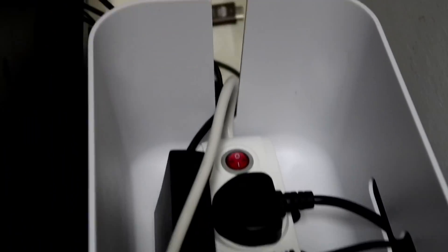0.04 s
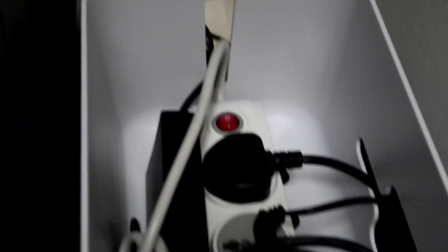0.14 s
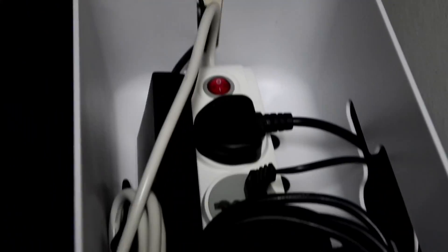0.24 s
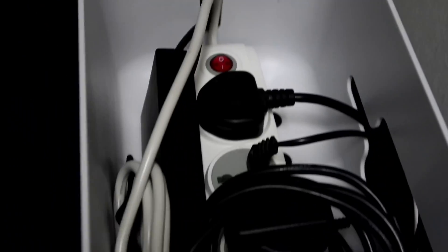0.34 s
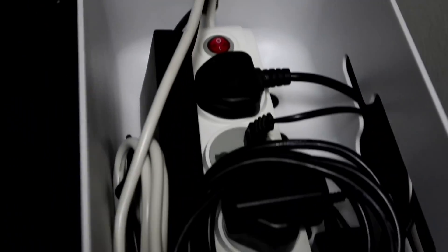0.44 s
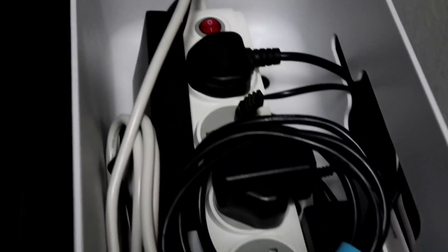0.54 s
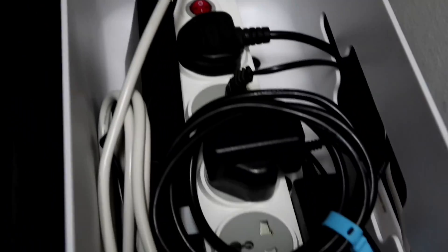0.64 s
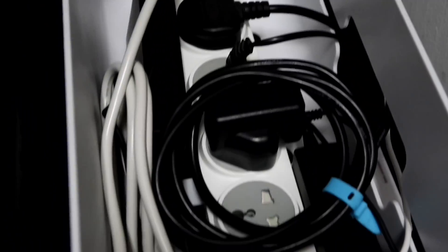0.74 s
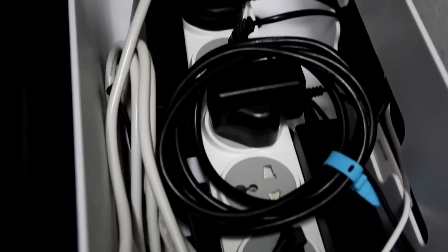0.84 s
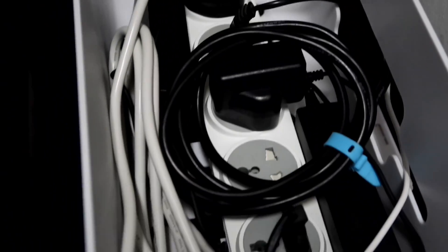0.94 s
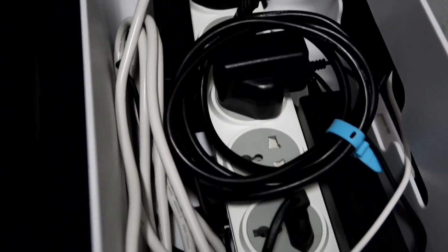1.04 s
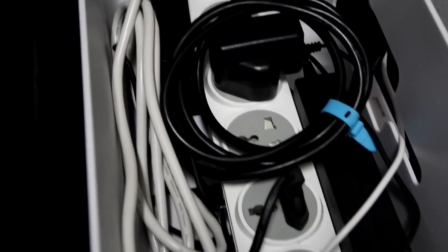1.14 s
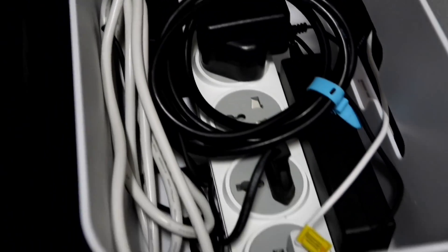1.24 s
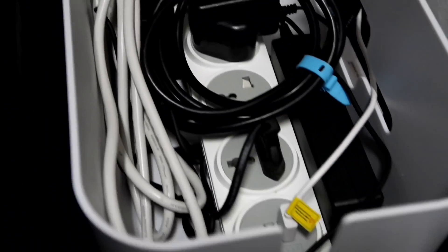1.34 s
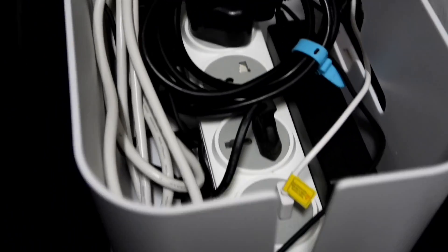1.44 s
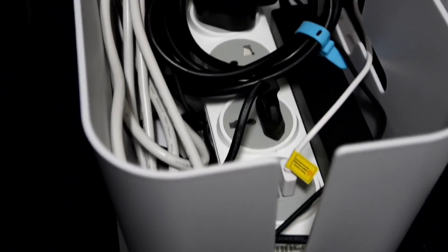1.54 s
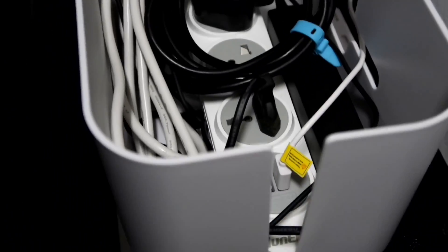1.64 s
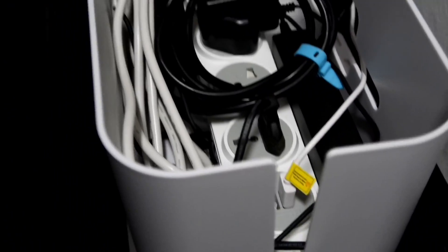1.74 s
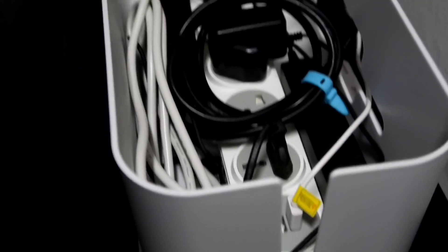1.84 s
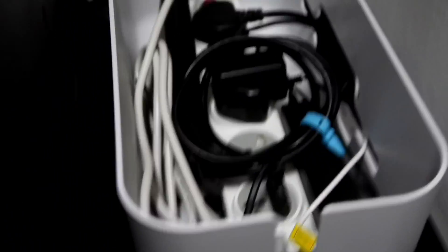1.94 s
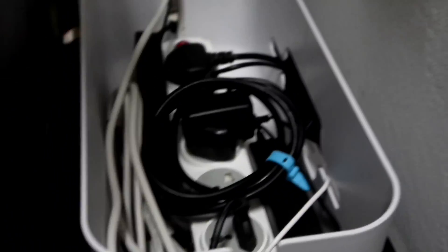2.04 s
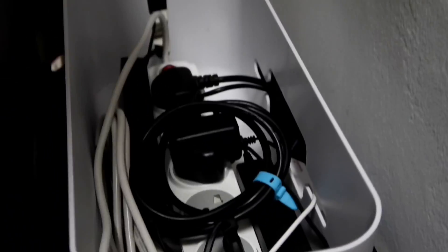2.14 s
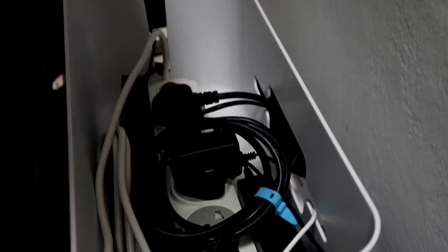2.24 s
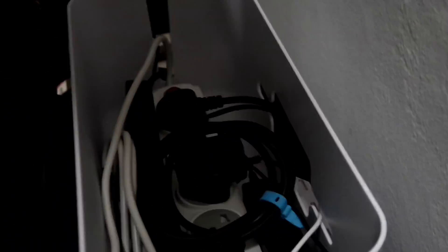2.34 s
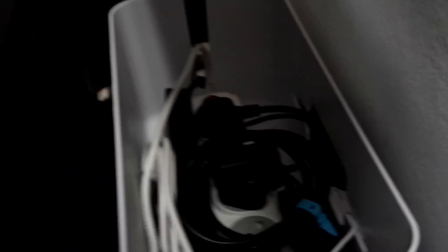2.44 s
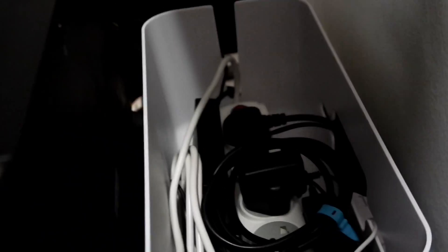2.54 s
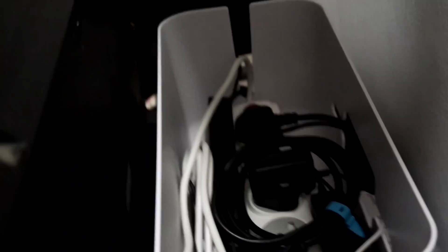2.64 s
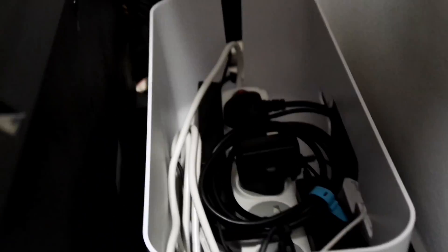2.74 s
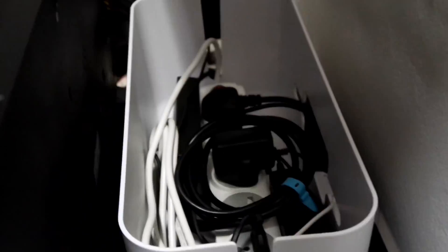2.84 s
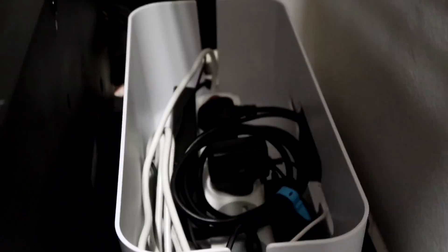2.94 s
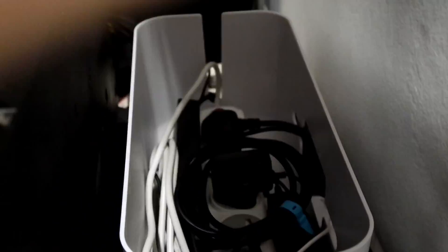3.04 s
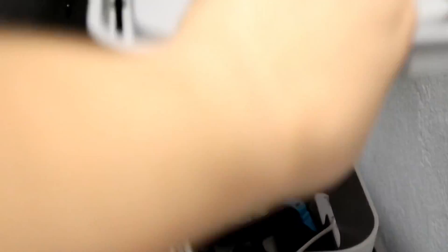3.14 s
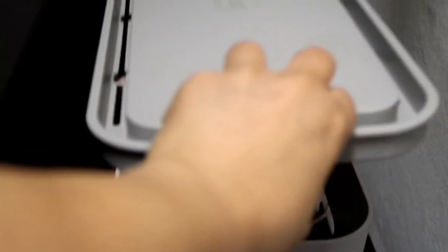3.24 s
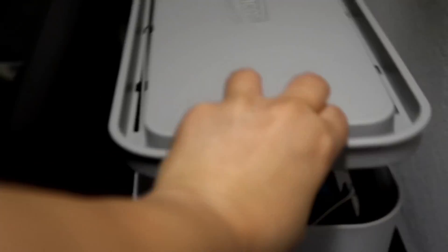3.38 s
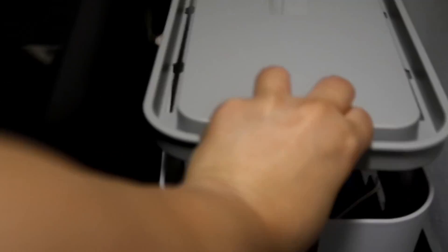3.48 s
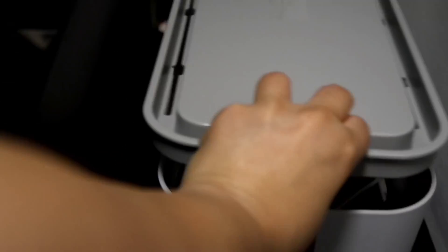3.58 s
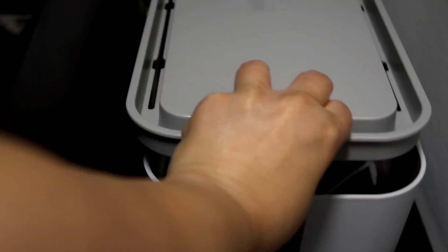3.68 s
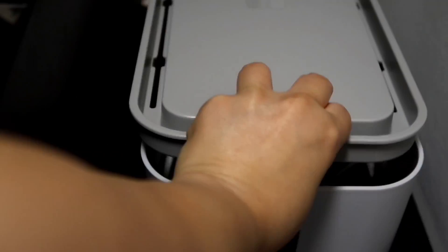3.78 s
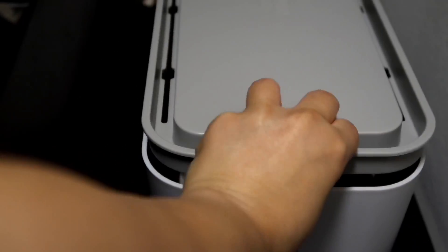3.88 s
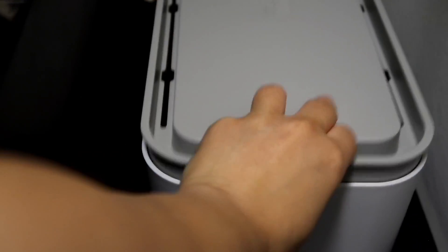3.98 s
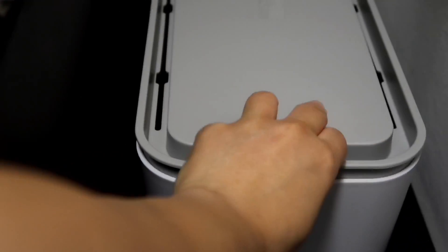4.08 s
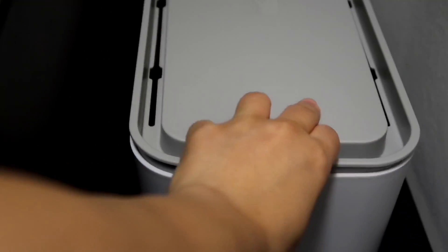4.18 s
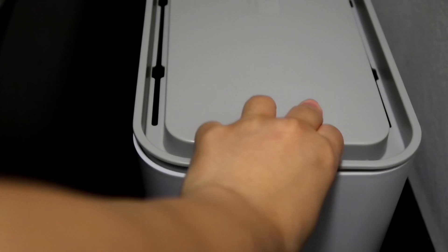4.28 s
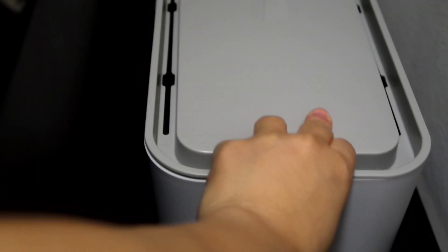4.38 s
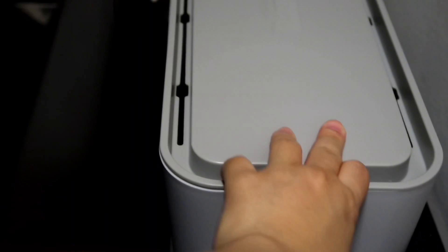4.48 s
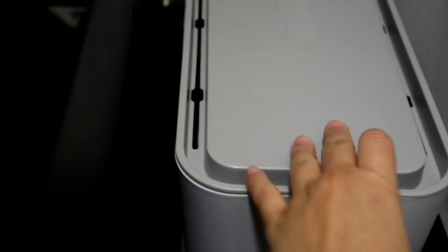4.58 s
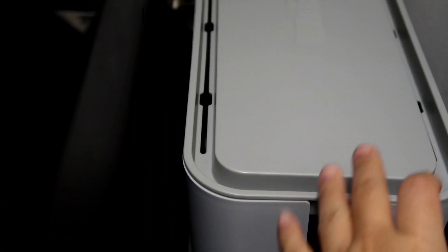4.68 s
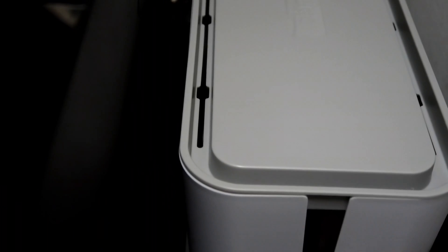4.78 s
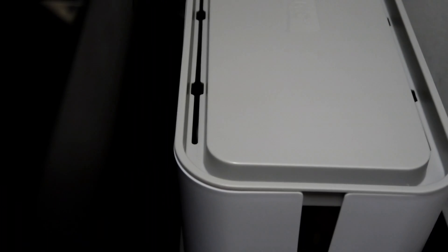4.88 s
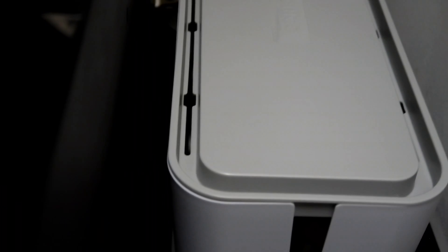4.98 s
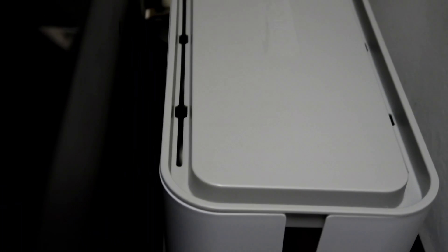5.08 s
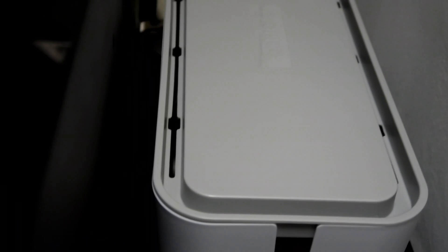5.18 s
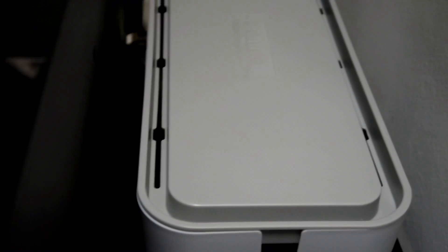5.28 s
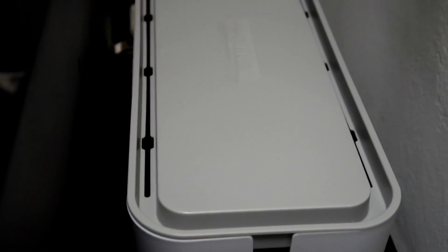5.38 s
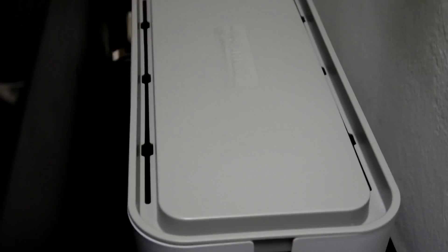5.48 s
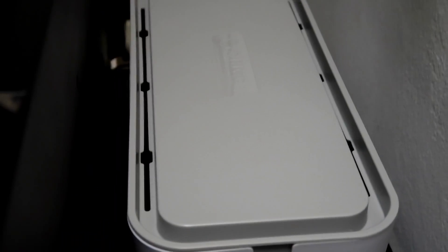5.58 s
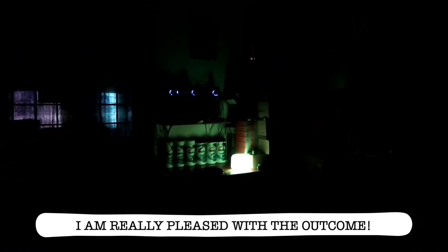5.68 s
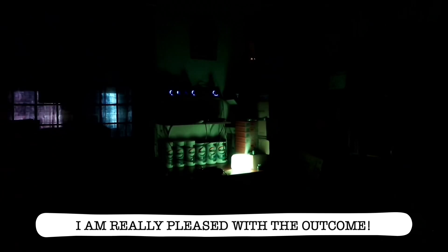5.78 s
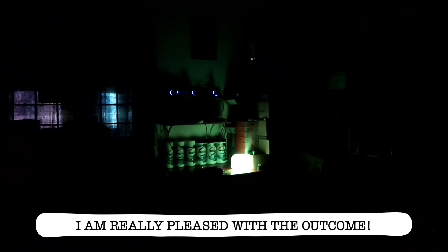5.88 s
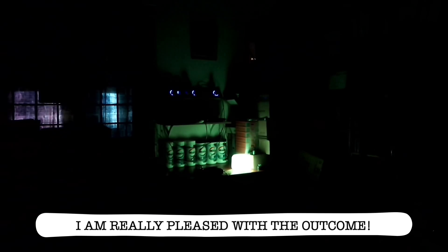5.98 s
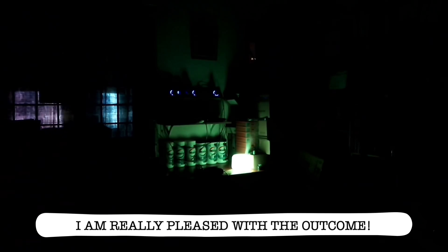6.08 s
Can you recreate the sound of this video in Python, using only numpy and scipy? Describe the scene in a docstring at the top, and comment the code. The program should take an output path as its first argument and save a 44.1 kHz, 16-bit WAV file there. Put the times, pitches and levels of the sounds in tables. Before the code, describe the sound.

Close plastic clacks, a short clatter and three squeaks as a lid is pressed onto a box, with hum and faint clock ticking behind.

```python
"""A plastic cable box is closed by hand, close to a stereo microphone in a small room.
The lid is picked up with a clack and a snap, clatters onto the rim, squeaks as it slides down and
clicks home. Behind it are a low mains hum, a faint clock and, early on, one far-off chirp or creak.
Near the end the sound drops out briefly, then a different room's steady background noise follows."""
import sys
import numpy as np
from scipy import signal
from scipy.fft import rfft, irfft, next_fast_len
from scipy.io import wavfile

SR = 44100
rng = np.random.default_rng(int(sys.argv[2]) if len(sys.argv) > 2 else 0)


def pcm_store(signal):
    """Save signal as 16-bit PCM."""
    levels = np.round(np.clip(np.atleast_2d(signal), -1, 1) * 32767)
    wavfile.write(sys.argv[1], SR, levels.astype(np.int16).T)


N = 269847
TIME = np.arange(N) / SR
AGE = TIME[:SR // 3]  # seconds since a blow
# the far-off creak, then the lid's three squeaks:
# (start [s], length [s], level [dB], pitch [Hz], jitter [share of pitch], rasp [dB])
RASPY_TONES = [(.848, 0.057, -53, 1430, .065, -4), (3.939, .085, -28.5, 1135, .02, -13),
               (4.12, .105, -27, 1105, .026, -17), (4.226, .23, -32.5, 1060, .026, -20)]


def lid_knocks():
    """The lid clatters onto the rim of the box and clicks home."""
    # blows on the rim: (time [s], level [dB], clack [dB], snap [dB], ring [dB])
    knocks = [(3.6455, -18.5, 6.5, -9.5, 6.5), (3.691, -22.5, 1.5, 2.5, -10), (3.738, -40, 11, 7, -12),
              (3.7675, -30, 1, -2, -9), (3.7825, -15, -7.5, 1, -1), (3.81, -23, 1, -3.5, -11),
              (3.823, -30, 7, 1.5, -14), (3.911, -23, -3, -0.5, -4), (4.012, -25.5, 1, 1.5, -6),
              (4.0385, -26.5, 9, 11, -9), (4.0425, -19, .5, -1.5, 3), (4.228, -34.5, -10, -1.5, -17),
              (4.348, -31.5, -10, -14, -0.5), (4.361, -31.5, -8, -8, -8), (4.427, -29.5, -2.5, -10, -11)]
    # spectrum of the shell on the rim: (frequency [Hz], gain [dB])
    rim_tone = [(40, -40), (125, -23.5), (200, -12), (270, -0.5), (400, -2), (600, -2.5), (780, -0.5),
                (1400, -4.5), (2100, -13), (3200, -18.5), (5300, -19.5), (8000, -28), (16000, -38.5)]
    # its modes, free of the hand: (frequency [Hz], level [dB], t60 [s])
    rim_modes = [(269, -13.5, .11), (544, -15, .16), (700, -5.5, 0.05), (765, -4, 0.039), (819, 2, 0.1),
                 (1430, -11, 0.057), (1944, -15.5, 0.088), (2416, -9.5, 0.075)]
    return blows(knocks, rim_tone, rim_modes, crack=.26, thud_db=-1, thud_trade=.54)


def lid_lift():
    """The lid clacks as it is picked up and rings in the air."""
    # blows of the lift: (time [s], level [dB], clack [dB], snap [dB], ring [dB])
    lifts = [(2.2477, -17.5, 0, 1, 1), (2.302, -36.5, -5, -4, -16), (2.336, -40, -2, 9.5, -14),
             (2.342, -32, -19, -21, -16)]
    # spectrum of the lifted shell: (frequency [Hz], gain [dB])
    lift_tone = [(40, -32), (130, -10.5), (240, 3), (400, -1.5), (600, -11.5), (850, -5.5), (1350, -11),
                 (1750, 0), (2400, -4.5), (4000, -2.5), (5300, -10.5), (7000, -16.5), (16000, -27)]
    # its modes: (frequency [Hz], level [dB], t60 [s])
    lift_modes = [(237, -11.5, 0.26), (498, -25, 0.72), (813, -14, 0.13), (1090, -16.5, 0.11),
                  (1606, 3.5, 0.042), (1698, 1.5, 0.037), (3760, -32, .12), (5300, -7.5, 0.031)]
    return blows(lifts, lift_tone, lift_modes, crack=.3, thud_db=1.5, thud_trade=.45)


def blows(rows, tone, modes, crack, thud_db, thud_trade):
    """Each contact has its own clack, snap and ring; the less a blow rings, the more it thuds."""
    hand_down_s, settle_s, pitch_drop = 3.75, .024, .11  # the hand comes to rest on the lid
    out = np.zeros(N)
    for s, db, clack_db, snap_db, ring_db in rows:
        weight = 1 - np.exp(-max(s - hand_down_s, 0) / settle_s)
        contact = [(300, thud_db - thud_trade * ring_db), (600, 0), (1000, 0),
                   (1800, clack_db), (3600, clack_db), (7000, snap_db)]
        impact = colour(strike(tone, crack), contact)
        ringing = amp(ring_db) * ring(modes, pitch=1 - pitch_drop * weight)
        add(out, s, amp(db) * (impact + ringing))
    return out


def strike(tone, crack):
    """A blow on plastic: a sharp crack, then the dense ring of the shell."""
    # decay of the plastic: (frequency [Hz], t60 [s])
    plastic_t60 = [(200, 0.14), (800, 0.083), (3000, 0.054), (10000, .035)]
    shell = dying_noise(plastic_t60)
    shell[0] += crack
    return burst(colour(shell, tone))


def ring(modes, pitch=1):
    """Damped modes start together; a pitch below 1, the weight of a hand, lowers and shortens them."""
    motion = 0
    for k, (hz, db, t60) in enumerate(modes):
        decay = 1e-3 ** (AGE / (t60 * pitch ** 4))
        motion += (-1) ** k * amp(db) * decay * np.sin(2 * np.pi * hz * pitch * AGE)
    return burst(highpass(motion, hz=190))  # a small panel radiates no deep bass


def lid_edge(snap_s=2.4755, snap_db=-23, ring_db=-26, scrape_ring=1.4):
    """The thin edge snaps free and scrapes on, exciting the same modes; fingertips tick on it."""
    # modes of the edge: (frequency [Hz], level [dB], t60 [s])
    edge_modes = [(638, -12.5, 0.43), (1556, -12.5, 0.26), (2060, -10, 0.16), (3284, -9, .08),
                  (3671, 0, 0.076), (4190, -3, 0.089), (5360, 1, 0.07), (5550, 6.5, 0.042),
                  (7450, -17, .09)]
    # its bright spectrum: (frequency [Hz], gain [dB])
    edge_tone = [(100, -15), (600, -5.5), (1800, -0.5), (3600, 3.5), (7500, 3.5), (9500, -9.5),
                 (16000, -9.5)]
    # light finger touches: (time [s], level [dB])
    touches = [(1.996, -54), (3.116, -49), (4.586, -56), (4.772, -56.5)]
    # scrapes of the edge: (start [s], length [s], level [dB])
    scrapes = [(2.491, 0.0055, -47), (2.519, 0.049, -45)]
    out, ringing = np.zeros(N), ring(edge_modes)
    add(out, snap_s, amp(snap_db) * strike(edge_tone, crack=.38) + amp(ring_db) * ringing)
    for s, db in touches:
        add(out, s, amp(db) * strike(edge_tone, crack=.28))
    slips = friction(slips_per_s=990, spread_db=5)
    grit = unit(colour(slips, edge_tone))
    resonance = unit(signal.oaconvolve(slips, ringing)[:N])
    pressure = strokes(scrapes, attack_s=.004, sag_db_per_s=35, release_s=.016)
    return out + pressure * unit(grit + scrape_ring * resonance)


def lid_squeaks():
    """The lid sticks and slips on its way down, squeaking three times."""
    return raspy_tones(RASPY_TONES[1:])


def raspy_tones(rows, full_db=-30, dulling=.21, flutter_db=2.5):
    """Unsteady, raspy tones that scoop up in pitch, then sink and dull as they fade."""
    # harmonics at full level, lowest first: (level [dB])
    partials = [1, -6, -14, -22.5]
    scoop, rise_s, sink_hz_per_s = .24, .025, 950  # scoop: share by which a tone starts flat
    out = np.zeros(N)
    for s, length_s, db, pitch_hz, unsteady, rasp_db in rows:
        gain = amp(db) * stroke(length_s, attack_s=.029, sag_db_per_s=55, release_s=.033)
        age = TIME[:len(gain)]
        hz = pitch_hz * (1 - scoop * np.exp(-(age / rise_s) ** 2)) - sink_hz_per_s * age
        jitter = unsteady * wander(280)[:len(age)]
        turns = np.cumsum(hz * (1 + jitter)) / SR
        fade_db = np.minimum(20 * np.log10(gain + 1e-9) - full_db, 0)
        tone = sum(amp(partial_db + dulling * k * fade_db) * np.sin(2 * np.pi * (k + 1) * turns)
                   for k, partial_db in enumerate(partials))
        puffs = rng.standard_normal(len(turns)) * np.cos(np.pi * turns) ** 2  # one per cycle
        rasp = unit(colour(puffs, [(1400, -9.5), (4100, -1), (8000, -32)])) * amp(rasp_db + fade_db / 2)
        flutter = unit(amp(flutter_db * wander(110)))[:len(age)]
        add(out, s, (unit(tone) + rasp) * gain * flutter)
    return out


def lid_rubbing():
    """Dull dragging of the shell and the light hiss of skin on it."""
    # plastic dragging on plastic: (start [s], length [s], level [dB])
    rubs = [(2.345, 0.035, -50), (2.49, .1, -47), (2.78, .04, -45), (2.848, .014, -40.5),
            (3.445, 0.016, -44.5), (3.795, .045, -35), (3.92, .04, -43), (4.122, .05, -44),
            (4.24, .13, -40.5), (4.425, .04, -41.5), (4.5, 0.14, -52.5)]
    # spectrum of the drag: (frequency [Hz], gain [dB])
    rub_tone = [(100, -33), (220, -15), (320, 1), (720, 0.5), (1000, -4), (1500, -14.5), (2200, -16.5),
                (4000, -35), (12000, -43)]
    # skin brushing the lid: (start [s], length [s], level [dB])
    brushes = [(4.565, .045, -48), (4.78, .18, -52)]
    skin_tone = [(200, -2), (1300, 2), (5000, -5.5), (15000, -19.5)]
    drag = unit(colour(friction(slips_per_s=700, spread_db=.5), rub_tone))
    skin = unit(colour(friction(slips_per_s=3000, spread_db=3), skin_tone))
    return (drag * strokes(rubs, attack_s=.013, sag_db_per_s=23, release_s=.048)
            + skin * strokes(brushes, attack_s=.026, sag_db_per_s=65, release_s=.04))


def friction(slips_per_s, spread_db):
    """Tiny slips of uneven size at random moments."""
    size = amp(spread_db * np.minimum(rng.exponential(1, N), 4))
    return size * rng.choice([-1, 1], N) * (rng.random(N) < slips_per_s / SR)


def stroke(length_s, attack_s, sag_db_per_s, release_s):
    """An envelope that builds, eases slowly and lets go."""
    age = TIME[TIME < length_s + release_s]
    attack = np.sin(np.pi / 2 * np.minimum(age / attack_s, 1)) ** 2
    release = np.clip(1 - (age - length_s) / release_s, 0, 1) ** 2
    return attack * amp(-sag_db_per_s * age) * release


def strokes(rows, attack_s, sag_db_per_s, release_s):
    """Gain over time of a series of strokes that share one envelope."""
    gain = np.zeros(N)
    for s, length_s, db in rows:
        add(gain, s, amp(db) * stroke(length_s, attack_s, sag_db_per_s, release_s))
    return gain


def far_creak():
    """A faint, rough, far-off chirp or creak before the lid is picked up."""
    return raspy_tones(RASPY_TONES[:1])


def clock(tick_db=-49, tock_db=-49.5, period_s=.5165, tock_lag_s=.263, rise_s=.0042, t60=.17):
    """A clock across the room: two alternating beats ring its case, blurred by the walls."""
    # case resonances on the tick: (frequency [Hz], width [Hz], level [dB])
    tick_modes = [(2535, 330, 1.5), (5730, 290, -5)]
    # and on the tock: (frequency [Hz], width [Hz], level [dB])
    tock_modes = [(2880, 950, 2), (4770, 1100, -6.5)]
    out, hz = np.zeros(N), np.arange(1, SR // 2, 20)
    envelope = (1 - np.exp(-AGE / rise_s)) * 1e-3 ** (AGE / t60)
    treble_loss = np.hypot(1, (hz / 7500) ** 3)
    for lag, modes, db in ((0, tick_modes, tick_db), (tock_lag_s, tock_modes, tock_db)):
        gain = sum(amp(peak_db) / np.hypot(1, (hz / f - f / hz) * f / width)
                   for f, width, peak_db in modes)
        case = np.c_[hz, 20 * np.log10(gain / treble_loss)]
        for s in np.arange(.027, 5.4, period_s):
            beat = rng.standard_normal(len(AGE)) * envelope
            add(out, s + lag, amp(db) * burst(colour(beat, case)))
    return out


def room(x, wet_db=-12, build_s=.0083):
    """A small room answers; the two microphone ports differ mostly in the treble."""
    # reverberation: (frequency [Hz], t60 [s])
    room_t60 = [(150, 0.43), (1500, 0.21), (5000, 0.21), (14000, 0.18)]
    # stereo width at the microphone: (frequency [Hz], side gain [dB])
    near_side = [(700, -40), (2400, -17.5), (4400, -14), (8000, -6), (15000, -1.5)]
    tail = dying_noise(room_t60) * (1 - np.exp(-AGE / build_s))
    mid = x + amp(wet_db) * signal.oaconvolve(x, tail / np.linalg.norm(tail))[:N]
    scatter = dying_noise([(200, .022), (10000, .012)])
    side = colour(signal.oaconvolve(mid, scatter)[:N], near_side)
    return np.array([mid + side, mid - side])


def hum(waver_db=1.9):
    """Low mains and fan tones that waver in pitch and strength."""
    # tones: (frequency [Hz], rms level [dB], pitch drift [Hz])
    tones = [(49.7, -86, 1), (99.5, -61.5, 3), (177.6, -57, 4.04), (199.5, -54, 1.5), (289, -59.5, 3.98),
             (383, -63, 5.97)]
    out = np.zeros(N)
    for hz, db, drift_hz in tones:
        strength = amp(db) * np.sqrt(2) * unit(amp(waver_db * wander(7.4)))
        turns = np.cumsum(hz + drift_hz * wander(9)) / SR
        out += strength * np.sin(2 * np.pi * turns)
    return out


def room_noise(tone, db):
    """Steady background, alike in both channels in the bass and unrelated in the treble."""
    # stereo width: (frequency [Hz], side relative to mid [dB])
    width = [(130, -24), (200, -13), (700, -0.5), (8000, 0)]
    mid, side = (unit(colour(rng.standard_normal(N), tone)) for _ in range(2))
    side = colour(side, width)
    return amp(db) * np.array([mid + side, mid - side])


def dying_noise(t60s, bands=11):
    """A crowd of modes with a flat spectrum, each band dying at its own speed."""
    hz = np.fft.rfftfreq(len(AGE), 1 / SR)
    noise = rfft(rng.standard_normal(len(AGE)))
    centres, out = np.geomspace(140, 14000, bands), 0
    for centre, pick in zip(centres, np.eye(bands)):
        share = np.interp(hz, centres, pick)
        band = irfft(noise * share, len(AGE)) * 1e-3 ** (AGE / read(t60s, centre))
        out += burst(band) * np.sqrt(share.sum())
    return out / np.linalg.norm(out)


def wander(rate_hz):
    """Smooth random motion of rms 1, up to about the given rate."""
    size = next_fast_len(N, True)
    hz = np.fft.rfftfreq(size, 1 / SR)
    hz = hz[hz < 3 * rate_hz]
    spectrum = rng.standard_normal(size // 8).view(complex)[:len(hz)]
    return unit(irfft(spectrum * np.exp(-(hz / rate_hz) ** 2), size)[:N])


def colour(x, tone, size=4096):
    """Minimum-phase filter through points of (frequency [Hz], gain [dB])."""
    hz = abs(np.fft.fftfreq(size, 1 / SR))
    log_gain = np.log(amp(read(tone, hz)))
    taps = np.fft.ifft(np.exp(np.conj(signal.hilbert(log_gain)))).real
    return signal.oaconvolve(x, taps[:size // 2])[:len(x)]


def highpass(x, hz):
    """Second-order bass cut."""
    return signal.sosfilt(signal.butter(2, hz, "highpass", fs=SR, output="sos"), x)


def read(points, hz):
    """Reads a table on a log-frequency axis."""
    f, value = np.transpose(points)
    return np.interp(np.log(hz + 1), np.log(f), value)


def add(mix, s, sound):
    """Mixes a sound in at a time in seconds."""
    part = mix[max(round(s * SR), 0):][:len(sound)]
    part += sound[:len(part)]


def amp(db):
    """Decibels to gain."""
    return 10 ** (np.asarray(db) / 20)


def unit(x):
    """Scales to rms 1."""
    return x / np.sqrt(np.mean(x ** 2) + 1e-20)


def burst(x):
    """Scales a short sound to the energy of 10 ms at rms 1."""
    return x / np.sqrt(np.sum(x ** 2) / (SR / 100) + 1e-20)


def scene():
    """The lid up close, creak, clock and hum behind; a brief dropout, then another room's noise."""
    # background of the first room: (frequency [Hz], gain [dB])
    first_tone = [(20, -18), (60, -11.5), (110, -5), (155, -7.5), (210, -4), (330, -5), (450, -5.5),
                  (700, -10.5), (1200, -17), (2500, -22), (5000, -26.5), (9000, -30.5), (15000, -38)]
    # background of the second room: (frequency [Hz], gain [dB])
    second_tone = [(15, -54), (25, -22), (108, -1.5), (317, -7), (373, -0.5), (463, -15.5), (516, -9.5),
                   (2000, -19.5), (16000, -41)]
    # the dropout: (first room stops [s], second fades in [s], second is full [s])
    dropout = (5.654, 5.684, 5.70)
    stop, start, full = dropout
    sources = lid_knocks() + lid_lift() + lid_edge() + far_creak() + lid_squeaks() + lid_rubbing()
    first_room = room(sources + clock()) + hum() + room_noise(first_tone, db=-52.5)
    fade_out = np.clip((stop - TIME) / .002, 0, 1)
    fade_in = np.interp(TIME, [stop - .002, stop, start, full], [0, .02, .03, 1])
    return first_room * fade_out + room_noise(second_tone, db=-48.5) * fade_in


def record(dry, low_hz=55, high_hz=16050):
    """The microphone sheds deep bass and the recorder cuts the highest treble."""
    band_limit = signal.firwin(401, high_hz, window=("kaiser", 9), fs=SR)
    return signal.oaconvolve(highpass(dry, low_hz), band_limit[None], "same", axes=1)


dry = scene()
out = record(dry)
pcm_store(out)
```